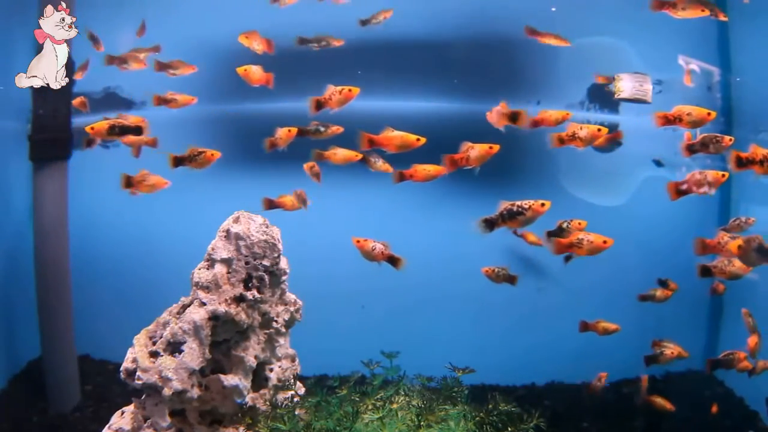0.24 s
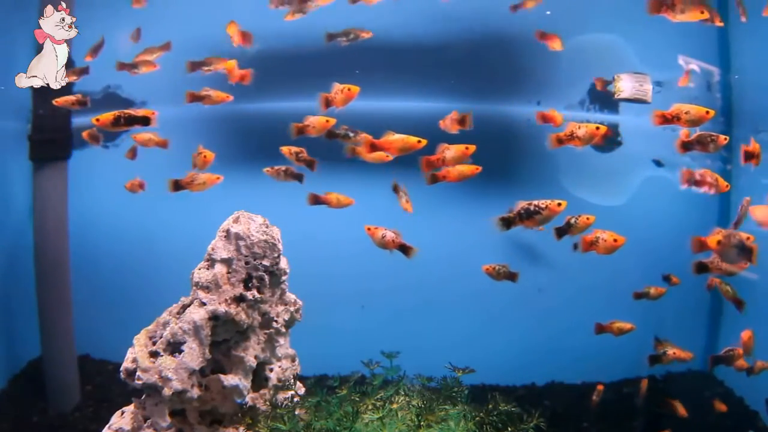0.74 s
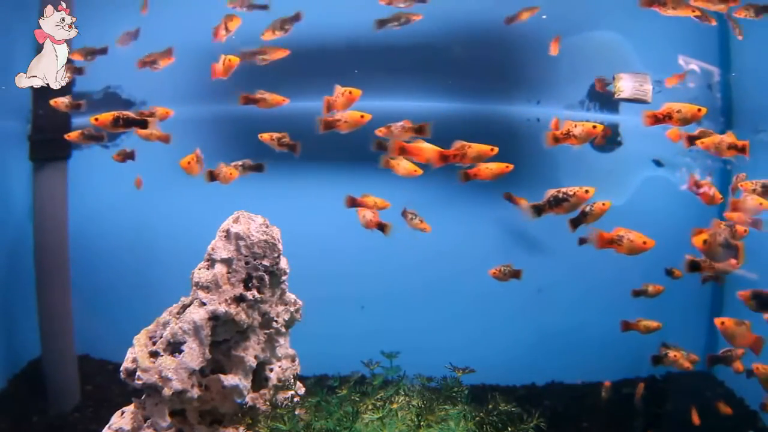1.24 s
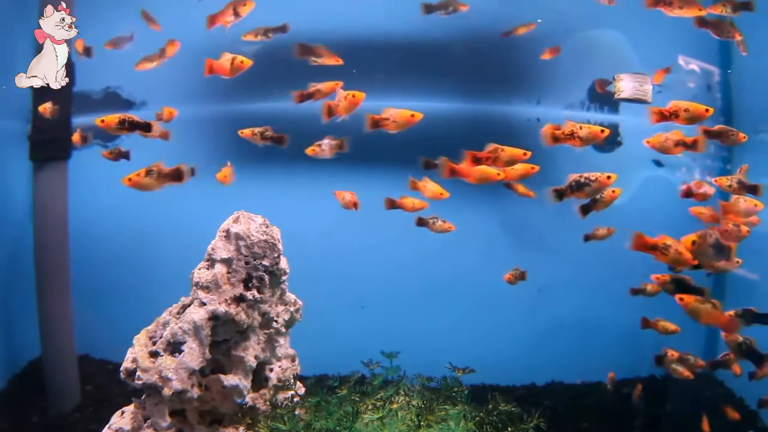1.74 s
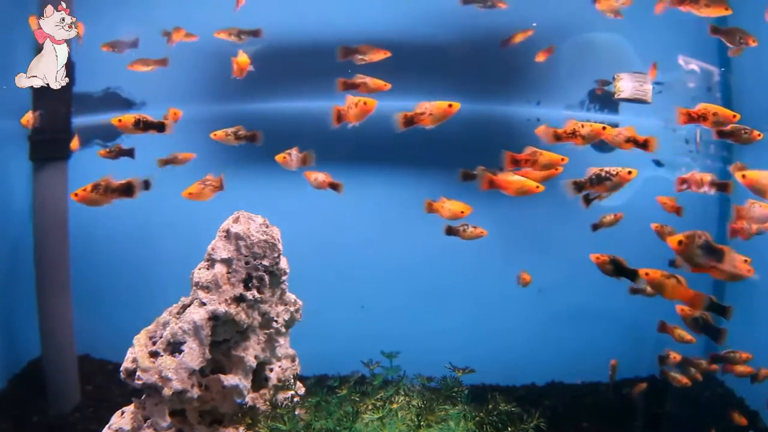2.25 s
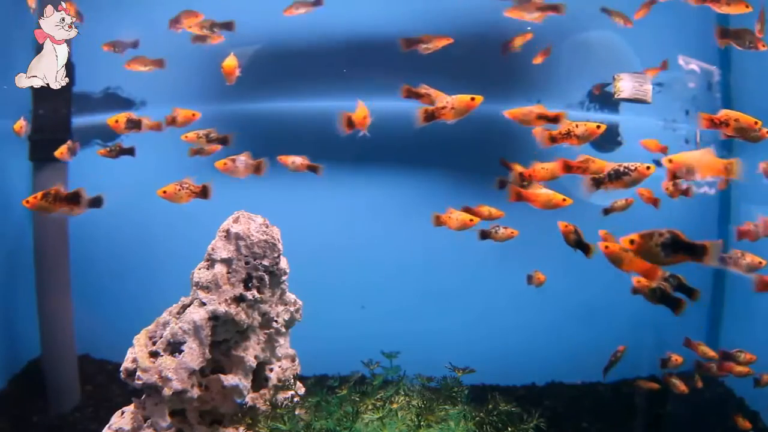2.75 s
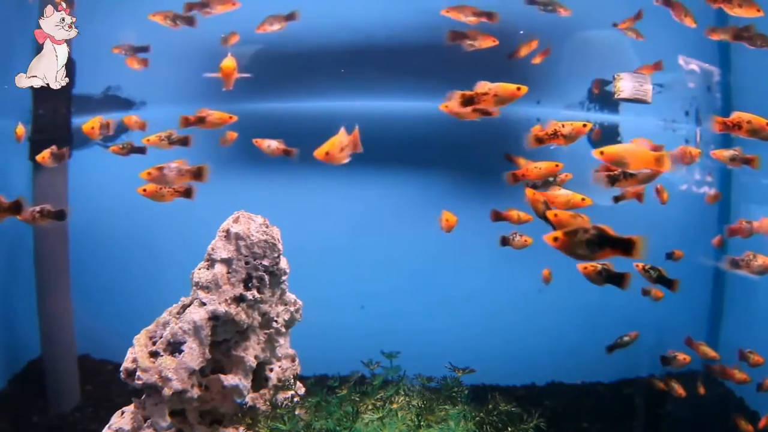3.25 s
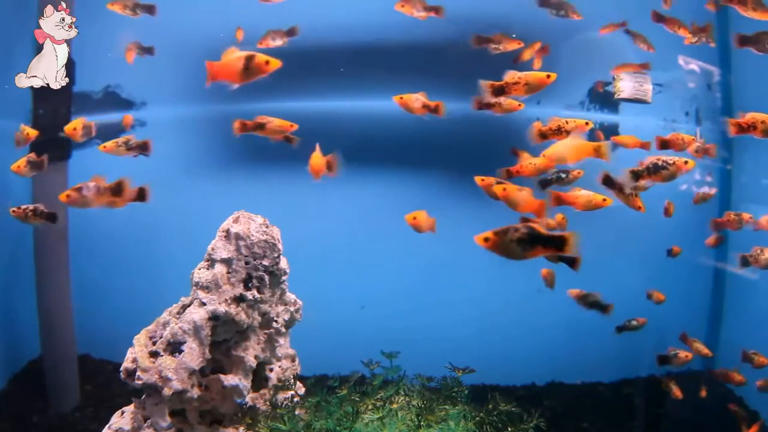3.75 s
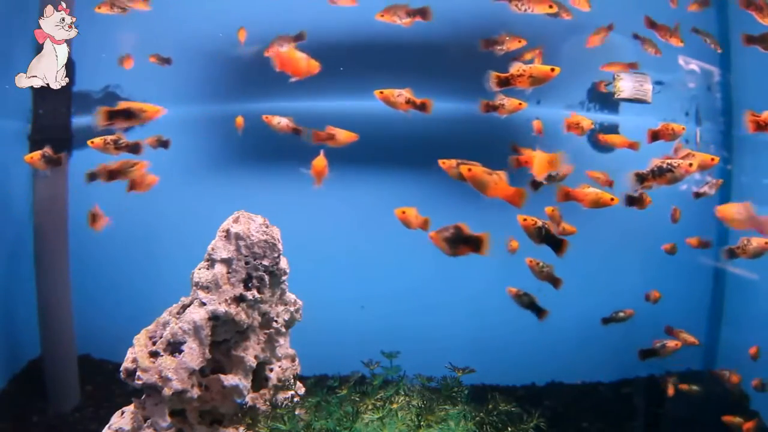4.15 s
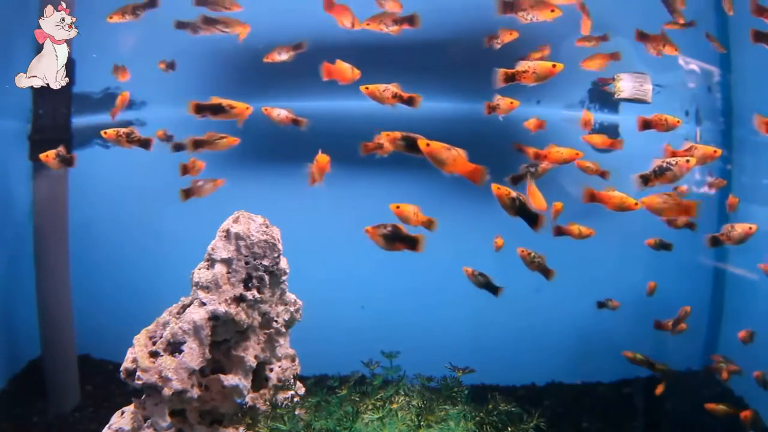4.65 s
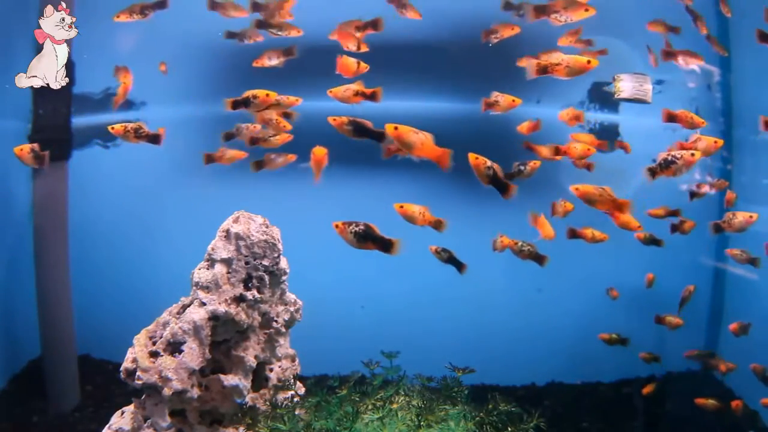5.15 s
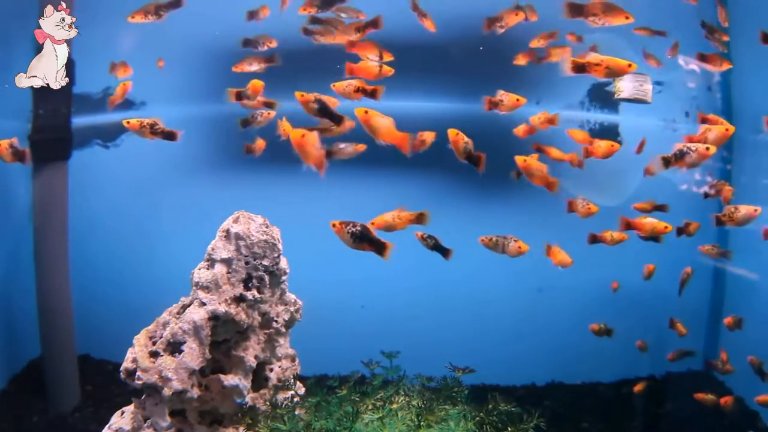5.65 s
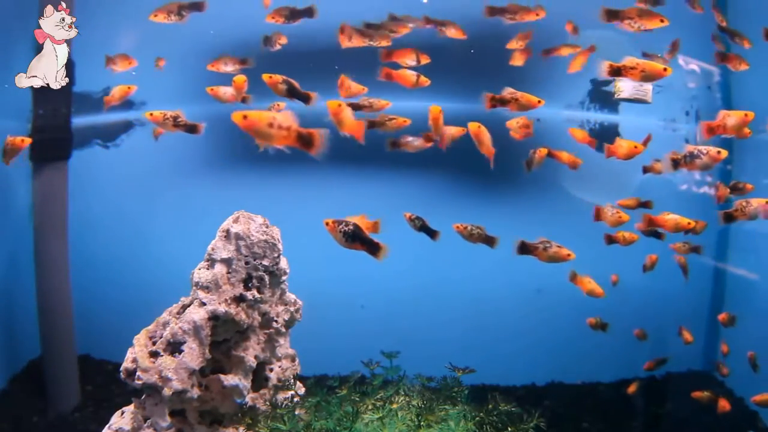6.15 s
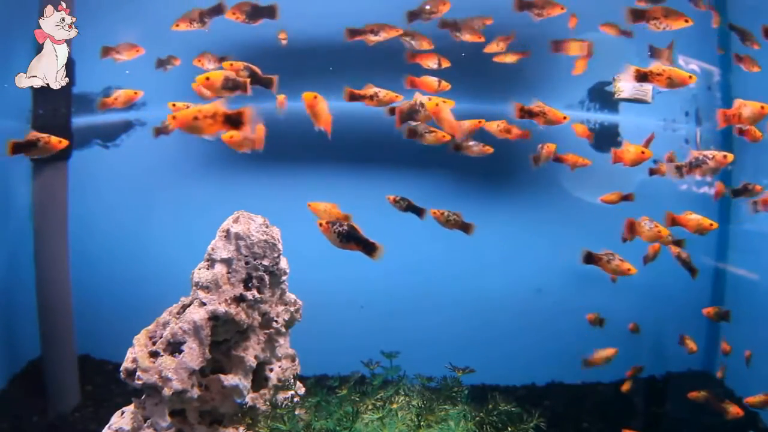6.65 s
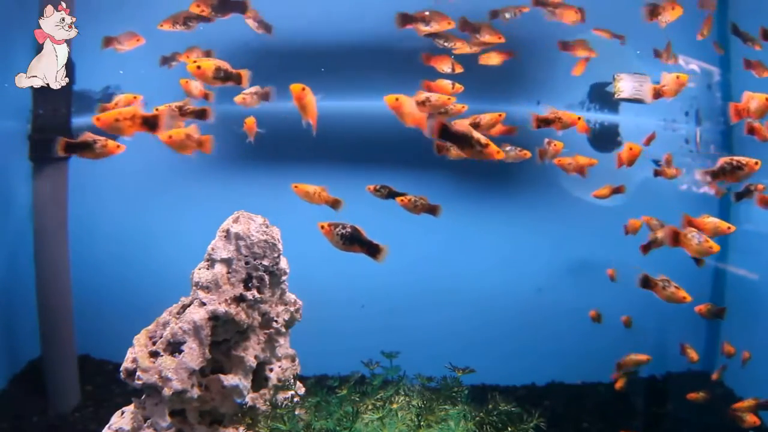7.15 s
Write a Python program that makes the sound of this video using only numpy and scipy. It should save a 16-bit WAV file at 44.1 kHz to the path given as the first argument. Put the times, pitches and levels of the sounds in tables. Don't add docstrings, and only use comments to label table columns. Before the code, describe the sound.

An indoor fish tank is heard close up in stereo. From the start, air bubbles and a thin trickle burst on the surface as a continuous bright, grainy fizz, with crisp snaps and small plinks scattered through it. A cluster of sharper, high snaps comes around 1.1 to 1.3 seconds, then the trickle thins slightly near 1.7 before filling out again. Clear ringing plinks stand out at about 1.9 and 2.5 seconds, with a bright snap near 2.9. The fizz is a touch fuller from 3.4, with a plip near 3.7 and a spit at 4.4. Another plink comes at about 5.5, a rounder blip at 5.7, then busy little snaps from 6.4 to 7.3 as it continues to the end. Short glassy echoes surround everything, and a faint pump hum and buzz stays steady underneath.

```python
import sys
import numpy as np
from scipy import signal
from scipy.fft import rfft, irfft, next_fast_len
from scipy.io import wavfile
from scipy.ndimage import uniform_filter1d, map_coordinates

SR = 44100
rng = np.random.default_rng(int(sys.argv[2]) if len(sys.argv) > 2 else 0)


def inscribe(sig):
    pcm = np.round(np.clip(np.atleast_2d(sig).T, -1, 1) * 32767)
    wavfile.write(sys.argv[1], SR, pcm.astype(np.int16))


def to_linear_factor(level_db):
    exponent = np.asarray(level_db, float) / 20
    return 10 ** exponent


N = 326340
SPOTS = 5


def unit(x):
    return x / np.sqrt(np.mean(x ** 2) + 1e-20)


def along(points, hz):
    f, v = np.transpose(points)
    return np.interp(np.log(hz + 1), np.log(f + 1), v)


def wobble(rate_hz):
    knots = rng.standard_normal(int(N * rate_hz / SR) + 4)
    return map_coordinates(knots, [np.arange(N) * rate_hz / SR])


def filtered(x, response):
    m = next_fast_len(N + SR // 4)
    hz = np.fft.rfftfreq(m, 1 / SR)
    return irfft(rfft(x, m) * response(hz), m)[..., :N]


def boosted(modes, hz):
    total = 1
    for centre, width, db in modes:
        damping = 1j * hz * width
        total = total + (to_linear_factor(db) - 1) * damping / (centre * centre - hz * hz + damping)
    return total


# multiple, level_db, left_minus_right_db
HUM = [(1, -69, 5), (3, -81, 0), (4, -85, 0), (6, -75, -2), (7, -74, -2), (8, -73, -2), (9, -79, -2)]
# freq_hz, density_db (per Hz)
BUZZ = [(15, -39), (25, -7), (59, -11), (104, -8.5), (214, -5), (352, -0.5), (550, -4.5), (639, -1),
        (741, -12), (846, -1), (965, -18), (1100, 1.5), (1300, -13.5), (1690, -43), (2860, -120)]
# freq_hz, width_hz, gain_db
HOUSING = [(143, 47, 9), (348, 35, 5.5), (650, 41, 3), (847, 26, 2.5)]
# freq_hz, left_right_correlation (-1..1)
LIKENESS = [(40, 0.66), (130, -0.53), (200, -0.72), (330, 0.84), (700, 0.64), (1300, 0.48)]


def pump():
    mains_hz = 60
    t = np.arange(N) / SR
    hum = 0
    for k, db, pan_db in HUM:
        level = to_linear_factor(db + 2.5 + 0.31 * wobble(3.06) + np.array([[pan_db / 2], [-pan_db / 2]]))
        phase = 0.65 * wobble(2.25) + np.array([[k], [k + 1.2 / k ** 2]])
        hum = hum + level * np.sin(2 * np.pi * k * mains_hz * t + phase)

    def mid_side(hz):
        turn = np.arccos(np.clip(along(LIKENESS, hz), -1, 1)) / 2
        return to_linear_factor(along(BUZZ, hz)) * boosted(HOUSING, hz) * [np.cos(turn), np.sin(turn)]

    mid, side = filtered(rng.standard_normal((2, N)), mid_side)
    buzz = unit(np.array([mid + side, mid - side])) * to_linear_factor([[-.4], [.4]])
    return hum + to_linear_factor(-56.5 + 0.25 * wobble(6.8)) * buzz


# time_s, level_db
TRICKLE = [(0.0, -42), (0.64, -45), (0.95, -42.5), (1.67, -47), (2.05, -43.5), (2.5, -43), (2.88, -43),
           (3.36, -41.5), (4.35, -42.5), (4.7, -42.5), (5.73, -41.5), (6.25, -43.5), (6.59, -44),
           (6.96, -43.5), (7.4, -43.5)]


def flow():
    s, db = np.transpose(TRICKLE)
    db = np.interp(np.arange(N) / SR, s, db)
    small_db, small_growth = -2, 0.93
    return to_linear_factor(db.mean() + small_db + small_growth * (db - db.mean())), to_linear_factor(db)


# start_s, peak_db, pitch_hz
SNAPS = [(0.027, -21, 9900), (0.417, -25, 10600), (0.6657, -19.5, 10600), (0.7562, -20, 10800),
         (0.8608, -24, 10700), (1.0986, -14, 11400), (1.1864, -12.5, 10400), (1.2509, -15, 10700),
         (1.545, -18.5, 11600), (2.754, -21.5, 11100), (2.8785, -13.5, 12700), (3.0496, -25.5, 11100),
         (3.324, -16.5, 10400), (3.671, -26, 10600), (3.973, -24, 12900), (4.025, -19, 10700),
         (4.761, -28, 9700), (5.107, -27, 13500), (5.262, -26, 11100), (5.324, -21, 9800),
         (5.35, -18, 11300), (5.5452, -25, 11000), (6.4783, -22, 10600), (6.5759, -21, 12400),
         (6.655, -23, 11500), (6.6975, -23, 11800), (6.783, -21.5, 12100), (7.1794, -17, 10000),
         (7.2075, -21.5, 11800), (7.2966, -24.5, 10200)]
SPITS = [(0.2118, -24.5, 9000), (0.2402, -26, 8300), (0.348, -23.5, 8600), (0.819, -26.5, 6360),
         (0.952, -30.5, 7040), (1.445, -28, 6300), (1.572, -29, 7000), (1.7828, -22.5, 8800),
         (1.829, -26.5, 9300), (2.1021, -28.5, 6760), (2.5984, -22.5, 8900), (3.4193, -18.5, 9060),
         (3.484, -25.5, 6700), (3.618, -23.5, 8300), (3.8555, -21, 7330), (4.411, -17.5, 8800),
         (5.396, -24, 7800), (5.672, -25.5, 9600), (6.048, -25.5, 9200), (6.106, -23, 7750),
         (6.3632, -23.5, 8240), (6.428, -26, 8300), (6.6139, -24.5, 7000), (0.181, -30, 7000),
         (0.5387, -31, 6960), (2.0113, -32.5, 6700), (2.544, -32, 8740), (3.146, -31, 9100),
         (5.7035, -28.5, 7700), (5.7678, -38, 9200)]
PLIPS = [(0.07, -26, 2940), (0.3136, -26.5, 2980), (0.4534, -31.5, 2870), (0.539, -25, 3020),
         (0.949, -27.5, 3050), (1.1866, -31.5, 3050), (1.446, -26, 2980), (1.9325, -31, 2400),
         (2.4608, -34.5, 2850), (2.8817, -30, 3020), (2.9753, -33, 3110), (3.3252, -30, 2800),
         (3.682, -22.5, 2910), (4.273, -32.5, 2970), (4.4254, -30, 2980), (4.513, -33.5, 2850),
         (4.561, -31, 2960), (4.789, -31, 2290), (4.8222, -29.5, 2950), (5.013, -30.5, 3030),
         (5.1123, -31, 2850), (5.234, -27.5, 3050), (5.3198, -30.5, 2900), (5.3698, -27, 2950),
         (5.8314, -31, 3040), (5.915, -30, 2880), (6.4262, -29, 2690), (6.4832, -30.5, 3060),
         (6.5986, -31, 2650), (7.341, -30, 3070)]


def lesser(count, top_db, range_db, favoured_hz, octaves):
    luck = rng.random((count, 4))
    s = (np.arange(count) + luck[:, 0]) / count * (N - 1) / SR
    centre_hz = np.take(favoured_hz, (luck[:, 1] * len(favoured_hz)).astype(int))
    hz = centre_hz * 2 ** (octaves * (luck[:, 2] - .5))
    trickle_db = np.interp(s, *np.transpose(TRICKLE))
    lull_s, lull_db = .03, -7.5
    wait_s = np.transpose(PLIPS + SPITS + SNAPS)[0][:, None] - s
    calm_db = lull_db * np.any((wait_s > 0) & (wait_s < lull_s), axis=0)
    db = top_db - range_db * luck[:, 3] + trickle_db - trickle_db.mean() + calm_db
    return list(zip(s, db, hz))


GLUGS = [(0.0513, -40, 1140), (0.1463, -37.5, 1370), (0.2108, -42, 1260), (1.0478, -35.5, 1470),
         (1.2163, -39.5, 1380), (1.269, -36.5, 1260), (1.284, -35.5, 1265), (1.3865, -42, 1450),
         (1.526, -36, 1247), (2.2758, -39.5, 1126), (2.7488, -37.5, 1410), (3.4447, -38, 1160),
         (4.137, -34, 1510), (4.2737, -37, 1245), (5.0502, -34.5, 1263), (6.1837, -41, 1260),
         (7.221, -32.5, 1470)]
GULPS = [(0.7477, -36, 1700), (0.953, -34, 1560), (1.417, -42, 1590), (1.4448, -32.5, 1600),
         (1.593, -40, 1660), (1.717, -43, 1760), (1.791, -43.5, 1680), (1.9194, -33, 2120),
         (2.109, -36, 1527), (2.4736, -29.5, 1584), (2.6685, -39, 1680), (3.1787, -38.5, 1920),
         (3.331, -38.5, 1780), (3.3645, -35.5, 2030), (3.7764, -35.5, 1570), (3.8112, -40, 1540),
         (4.0405, -40, 1790), (4.5728, -40, 1530), (4.808, -37, 1690), (4.9417, -37.5, 1690),
         (5.4187, -36.5, 1540), (5.578, -35, 1537), (5.669, -26.5, 1560), (6.133, -40, 1560),
         (6.6194, -40, 1810), (6.7622, -34.5, 1560), (6.8044, -40, 1590), (6.833, -42, 1600),
         (6.9208, -39.5, 1620), (7.0813, -34.5, 1560)]
BLIPS = [(0.18, -36, 2800), (1.0715, -39, 2300), (2.146, -38.5, 2520), (2.6662, -39, 2600),
         (3.5309, -35, 2470), (3.922, -38.5, 2350), (4.014, -35, 2650), (4.343, -34.5, 2750),
         (5.437, -37.5, 2240), (5.6344, -31, 2770), (5.8197, -33.5, 2250), (6.2133, -36, 2300),
         (6.9481, -38.5, 2230), (7.1206, -36, 2600)]
PLINKS = [(0.2114, -29.5, 3247), (0.2307, -28.5, 3680), (0.3466, -28.5, 4770), (0.4962, -28.5, 3290),
          (0.6097, -26, 3290), (0.8601, -27.5, 3290), (1.1273, -30.5, 5130), (1.913, -22, 3290),
          (2.5157, -19, 3290), (2.8838, -27.5, 4730), (3.114, -28.5, 4820), (3.1773, -30.5, 3280),
          (3.2616, -28.5, 4650), (3.3837, -33.5, 3740), (3.9434, -35, 3600), (4.1623, -31.5, 3300),
          (4.412, -29.5, 3250), (4.5416, -27.5, 3290), (4.7616, -32, 3360), (4.8983, -31, 3670),
          (5.46, -21.5, 3290), (5.7498, -34.5, 3350), (6.267, -36, 4500), (6.3014, -34, 4570),
          (7.1054, -34, 3780), (7.1766, -28, 4570), (7.209, -24, 4650), (7.2367, -30, 4270),
          (5.002, -33, 3330), (2.1857, -36.5, 3160)]


def bursts():
    large = GLUGS + GULPS + lesser(
        count=36, top_db=-42.5, range_db=11, favoured_hz=[1260, 1560, 1560, 1754], octaves=0.077)
    smaller = BLIPS + PLIPS + PLINKS + lesser(
        count=90, top_db=-32.5, range_db=11,
        favoured_hz=[2900, 3040, 3050, 3426, 3620, 4330, 4680], octaves=0.15)
    films = SPITS + SNAPS + lesser(
        count=70, top_db=-29, range_db=1.5, favoured_hz=[6800, 8300, 10600, 12700], octaves=0.16)
    return large, smaller, films


def pings(s, db, hz, cycles, rise, size):
    t = np.arange(size) / SR
    luck = rng.random((len(s), 3))
    life_s = (cycles * (0.35 + 0.39 * luck[:, 0]) / hz)[:, None]
    turns = hz[:, None] * t * (1 + rise * np.minimum(t / life_s, 3) / 2) + luck[:, 1:2]
    envelope = np.exp(-t / life_s) * (1 - np.exp(-6 * t / life_s))
    wave = to_linear_factor(db)[:, None] * envelope * np.sin(2 * np.pi * turns)
    spot = (luck[:, 2] * SPOTS).astype(int)
    start = spot * (N + size) + np.clip(s * SR, 0, N - 1).astype(int)
    index = start[:, None] + np.arange(size)
    line = np.bincount(index.ravel(), wave.ravel(), SPOTS * (N + size))
    return line.reshape(SPOTS, -1)[:, :N]


# freq_hz, width_hz, gain_db
LID = [(1260, 29, 4), (1560, 45, 6.5), (1722, 32, 0.5), (1990, 140, -7.5), (2300, 25, -4), (2980, 130, 3),
       (3290, 44, 5.5), (3740, 180, 1.5), (4650, 490, 3.5), (7930, 190, 3), (10600, 1250, 4),
       (12800, 2100, 4)]


def heard_bubbles(large, smaller, films):
    out = 0
    for rows, boost_db, cycles, rise, tick_db, tick_hz in [
            (large, 4, 7, .01, 5, 1500),
            (smaller, 4, 9, .01, 1, 4500),
            (films, 2.1, 8, .02, -6, 9000)]:
        s, db, hz = np.transpose(rows)
        db = db + boost_db - 20 * np.log10(np.abs(boosted(LID, hz)))
        out = out + pings(s, db, hz, cycles, rise, size=800)
        out = out + pings(s, db + tick_db, tick_hz + 0 * hz, 0.39, 0, size=40)
    s, db, hz = np.repeat(np.transpose(films), 4, axis=1)
    luck = rng.random((len(s), 2))
    later = luck[:, 0] ** 2
    drop_hz = np.minimum(hz * 2 ** (0.94 * luck[:, 1] - .4), 15500)
    return out + pings(s + .009 * later, db - 3 - 5 * later, drop_hz, 5.9, 0.041, size=250)


def stirring(rows, linger_s=0.011):
    s, db, _ = np.transpose(rows)
    kicks = np.bincount((s * SR).astype(int), to_linear_factor((db + 36) / 2), N)
    shake = np.log(0.45 + signal.lfilter([1], [1, -np.exp(-1 / (linger_s * SR))], kicks))
    return unit(shake - shake.mean()) + 0.59 * wobble(60)


def swarm(level_db, clumps, count, centre_hz, octaves, cycles, spread_db, clump_db, size):
    luck = rng.random((count, 2))
    s = luck[:, 0] * N / SR
    hz = np.clip(centre_hz * 2 ** (octaves * rng.standard_normal(count)), 1000, 16000)
    db = spread_db * luck[:, 1] + clump_db * clumps[(s * SR).astype(int)]
    return to_linear_factor(level_db) * unit(pings(s, db, hz, cycles, 0.041, size))


def froth(clumps):
    small, fizz = flow()
    low = swarm(-29.5, clumps, count=600, centre_hz=1507, octaves=0.23, cycles=5.9,
                spread_db=25, clump_db=0.5, size=700)
    middle = swarm(-16.5, clumps, count=2600, centre_hz=3224, octaves=.4, cycles=7.8,
                   spread_db=14.5, clump_db=1.0, size=400)
    ticks = swarm(-20.5, clumps, count=1300, centre_hz=6260, octaves=0.47, cycles=0.83,
                  spread_db=12, clump_db=2.0, size=40)
    high = swarm(-12.5, clumps, count=5500, centre_hz=10970, octaves=0.492, cycles=6.2,
                 spread_db=13, clump_db=2.5, size=160)
    return small * (low + middle) + fizz * (ticks + high)


# freq_hz, t60_s
ECHO = [(1000, 0.078), (3000, 0.028), (8000, 0.023), (15000, 0.0095)]


def tank(spots, echo_db=12, late_db=-20, side_db=-5):
    hz, t, z = signal.stft(rng.standard_normal((2, SPOTS, SR // 5)), SR, nperseg=128)
    fade = to_linear_factor(-60 * t / along(ECHO, hz)[:, None]) + to_linear_factor(late_db - 60 * t / 0.076)
    mid, side = signal.istft(z * fade, SR, nperseg=128)[1]
    scale = to_linear_factor(echo_db) / np.linalg.norm(mid, axis=1, keepdims=True)
    tails = scale * np.array([mid + to_linear_factor(side_db) * side, mid - to_linear_factor(side_db) * side])
    tails[..., 0] += 1
    m = next_fast_len(N + SR // 4)
    paths = rfft(tails, m)
    paths = paths / np.sqrt(uniform_filter1d(np.abs(paths) ** 2, size=1800))
    echoed = irfft(np.sum(rfft(spots, m) * paths, axis=1), m)[:, :N]

    def colour(f):
        no_bass = (1j * f / (400 + 1j * f)) ** 2
        dull_top = 1 + 1j * f / 14000
        return boosted(LID, f) * no_bass / dull_top

    return filtered(echoed, colour) * to_linear_factor([[7.5], [8.5]])


# freq_hz, density_db (per Hz)
SPRAY = [(700, -23), (1500, -22), (2000, -20), (3000, -6.5), (6000, -6), (10500, -7), (13500, -4.5),
         (16000, -10)]


def spray(clumps):
    mid, side = filtered(rng.standard_normal((2, N)), lambda hz: to_linear_factor(along(SPRAY, hz)))
    swell = to_linear_factor(-6 + 0.59 * uniform_filter1d(clumps, size=400))
    fizz = flow()[1]
    return swell * fizz * unit(np.array([mid + 0.24 * side, mid - 0.52 * side]))


def scene():
    large, smaller, films = bursts()
    clumps = stirring(large + smaller + films)
    surface = heard_bubbles(large, smaller, films) + froth(clumps)
    return tank(surface) + spray(clumps) + pump()


def top_cut(x):
    return signal.sosfilt(signal.butter(12, 17020, fs=SR, output="sos"), x)


def record(dry):
    top_hz = 15850
    mix = filtered(dry, lambda hz: hz < top_hz)
    return top_cut(mix)


dry = scene()
out = record(dry)
inscribe(out)
```